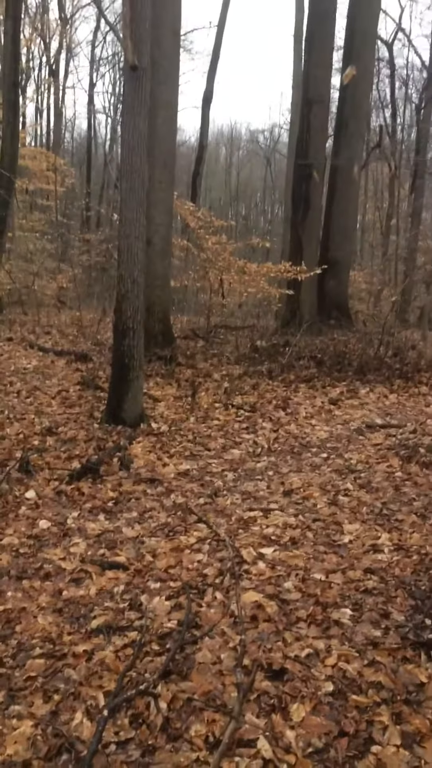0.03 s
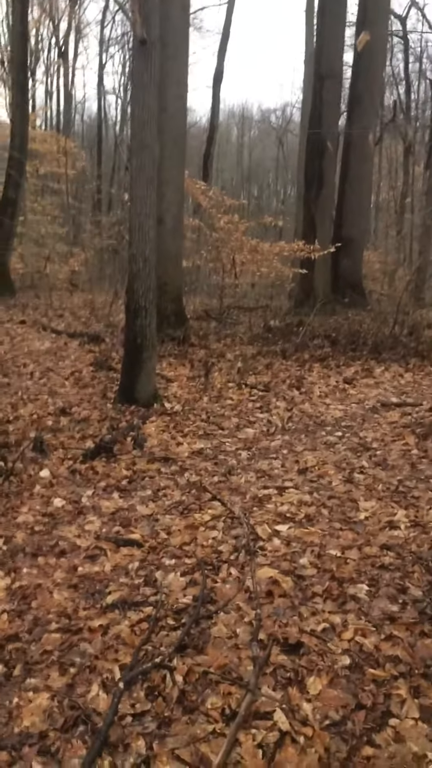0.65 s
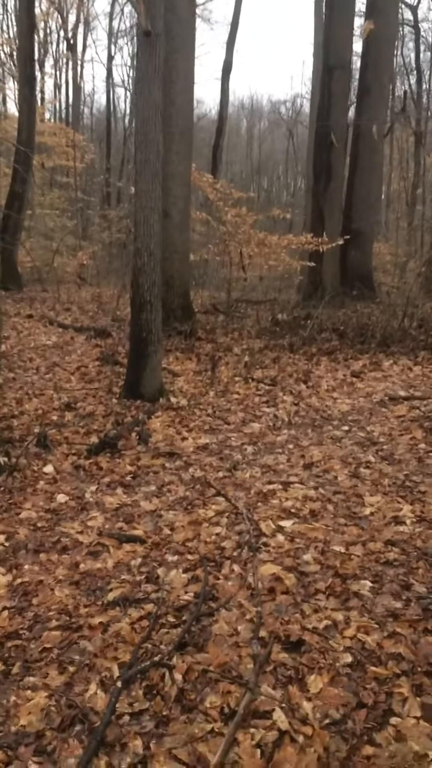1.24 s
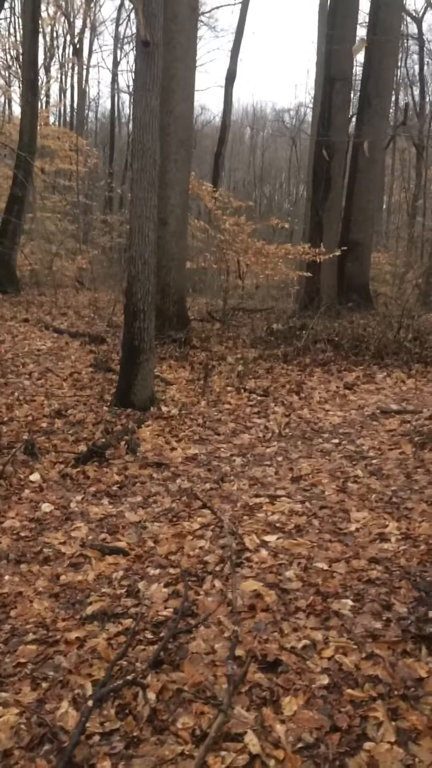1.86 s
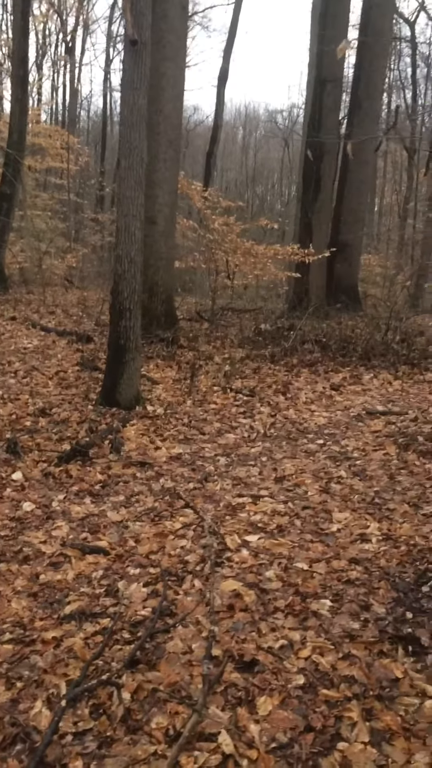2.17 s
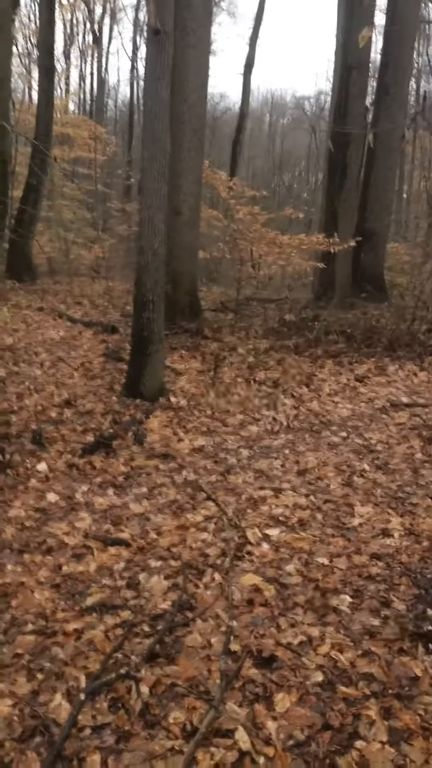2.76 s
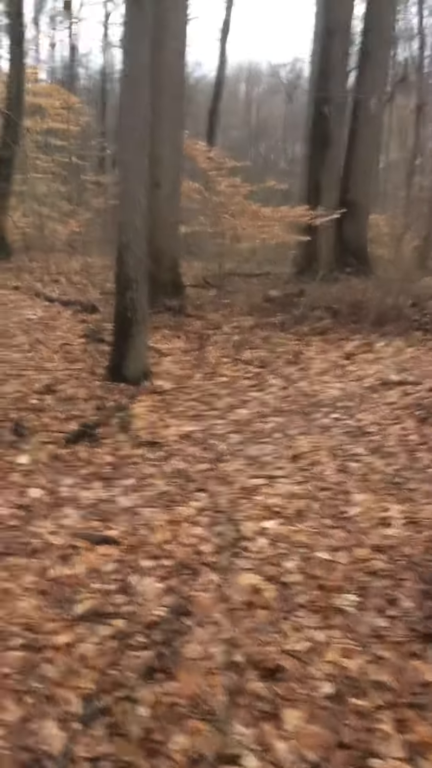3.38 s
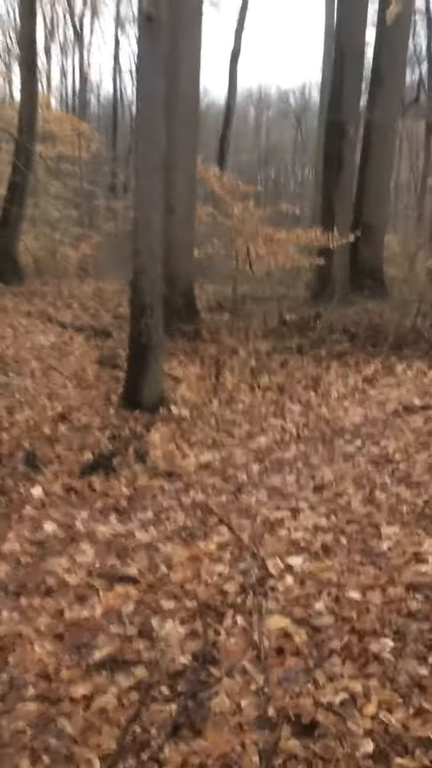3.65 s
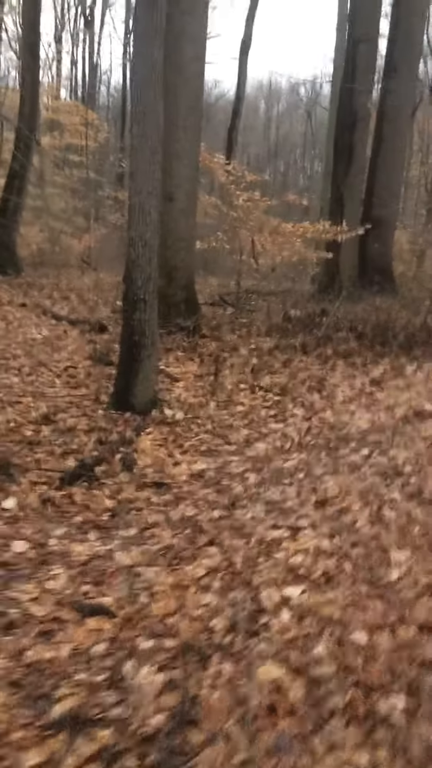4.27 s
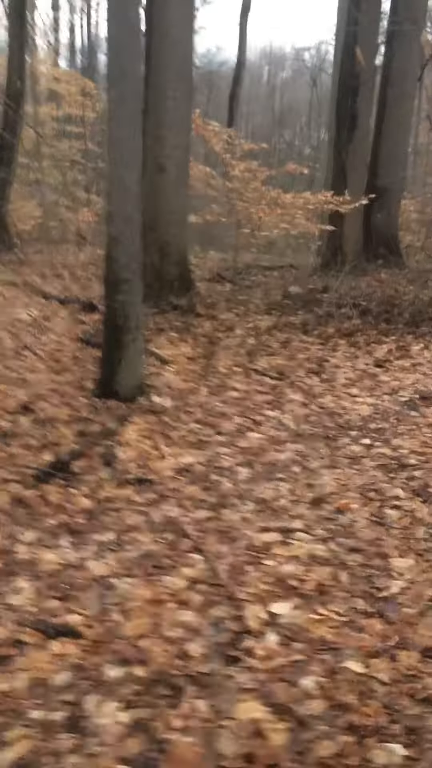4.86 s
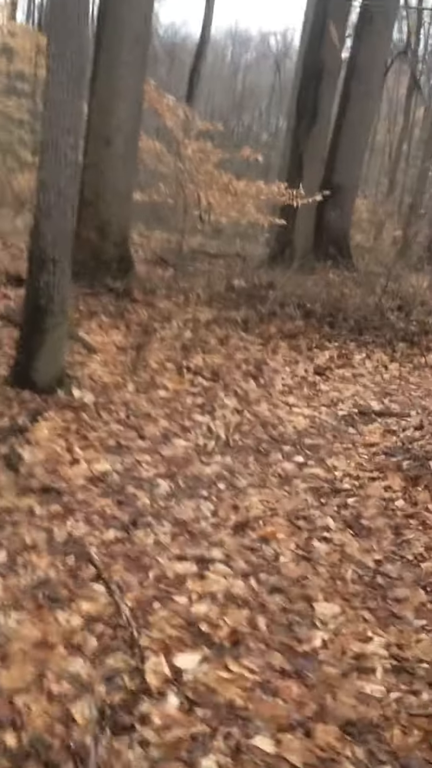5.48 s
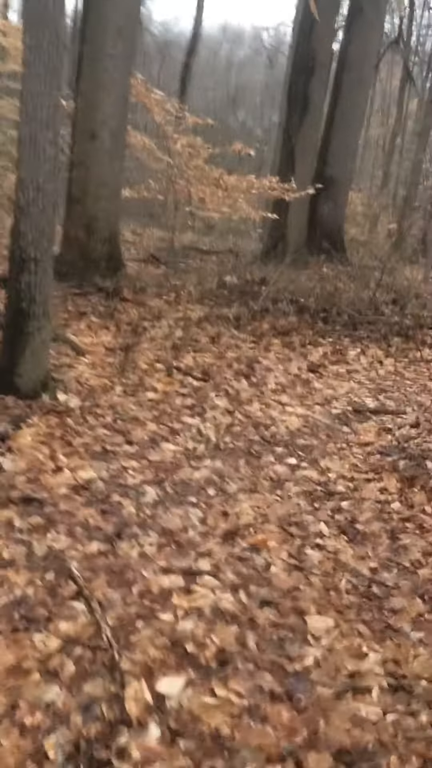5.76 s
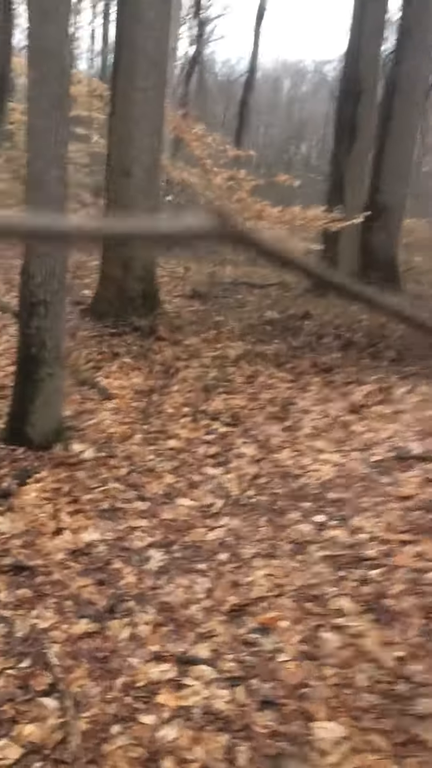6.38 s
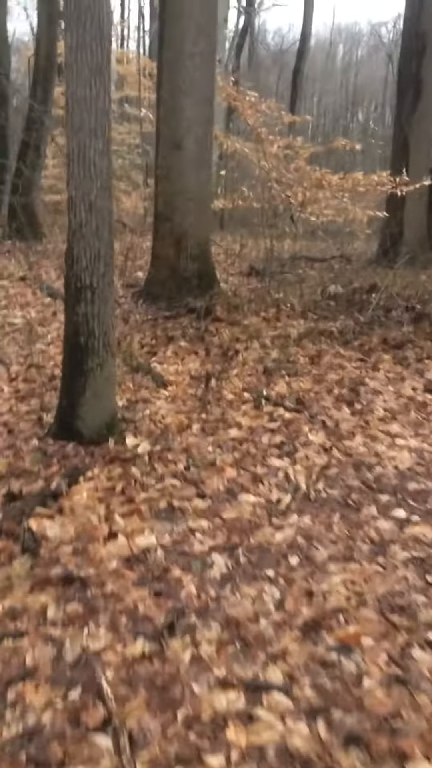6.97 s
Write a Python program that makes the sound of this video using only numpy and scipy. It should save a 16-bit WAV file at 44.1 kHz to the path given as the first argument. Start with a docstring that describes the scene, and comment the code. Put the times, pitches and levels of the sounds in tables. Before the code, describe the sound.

Many small frogs whistle steadily over faint traffic and breeze, as someone walks slowly through dry leaves, cracking small stems.

```python
"""Over far traffic and breeze on the microphone, a dense chorus of small frogs peeps from a woodland pond:
each call is a short rising whistle that echoes off bare trunks. A low engine drones through the first half.
Someone starts walking slowly through dry leaves, and hoarse whistles come from deep in the wood.
Near 3 s a bird squeals once; then stems crack underfoot. Near the end a twig knocks on the microphone."""
import sys
import numpy as np
from scipy import signal
from scipy.fft import rfft, irfft
from scipy.io import wavfile
from scipy.ndimage import uniform_filter1d, map_coordinates

SR = 44100
rng = np.random.default_rng(int(sys.argv[2]) if len(sys.argv) > 2 else 0)


def int16_out(signal):
    """Quantize to a 16-bit WAV file."""
    q = np.round(np.clip(np.atleast_2d(signal).T, -1, 1) * 32767)
    wavfile.write(sys.argv[1], SR, q.astype(np.int16))


N = 310023
TIME = np.arange(N) / SR


def from_db(db):
    """Decibels to gain."""
    return 10 ** (np.asarray(db) / 20)


def rms_one(x):
    """Scale to rms 1."""
    return x / np.sqrt(np.mean(x ** 2) + 1e-20)


def in_time(rows):
    """Each column of a curve at every sample."""
    time_s, *columns = np.transpose(rows)
    return [np.interp(TIME, time_s, column) for column in columns]


def add(out, start_s, sound):
    """Mix a sound in at start_s, cut at the ends."""
    i = int(round(start_s * SR))
    low, high = max(i, 0), min(i + len(sound), N)
    if high > low:
        out[low:high] += sound[low - i:high - i]


def drift(knots_per_s):
    """Random wander, rms 1."""
    knots = rng.standard_normal(4096)
    return rms_one(map_coordinates(knots, [TIME * knots_per_s], order=1, mode="wrap"))


def coloured(white, spectrum):
    """Give a white signal a spectrum, rms 1."""
    hz, db = np.transpose(spectrum)
    bins_hz = np.maximum(np.fft.rfftfreq(N, 1 / SR), 1)
    gain = from_db(np.interp(np.log(bins_hz), np.log(hz), db)) * np.minimum(bins_hz / hz[0], 1)
    return rms_one(irfft(rfft(white) * gain, N))


def swells(rows, attack_s, release_db_per_s, sag_db_per_s=0):
    """Summed power of events that rise, hold or sag, and die away."""
    power = np.zeros(N)
    for peak_s, hold_s, db in rows:
        age_s = TIME - peak_s
        rise = np.clip(1 + age_s / attack_s, 0, 1)
        sag_db = sag_db_per_s * np.clip(age_s, 0, hold_s)
        release_db = release_db_per_s * np.maximum(age_s - hold_s, 0)
        power += (rise * from_db(db - sag_db - release_db)) ** 2
    return power


def woods(x, t60_s, echoes_per_s):
    """Scattered, decaying echoes off trunks; unit-energy response."""
    t = np.arange(SR) / SR
    echoes = rng.standard_normal(SR) * (rng.random(SR) < echoes_per_s / SR)
    echoes *= from_db(-60 * t / t60_s)
    return signal.fftconvolve(x, echoes / np.sqrt(np.sum(echoes ** 2) + 1e-20))[:N]


# background noise: freq_hz, density_db
BACKGROUND_SPECTRUM = [(100, -4.5), (200, -4), (330, 0.5), (480, -1.5), (900, 1.5), (1300, -2.5),
                       (1700, -7.5), (2200, -11.5), (3500, -48), (4600, -22), (5500, -32.5), (8000, -33.5),
                       (12000, -39.5), (16000, -44)]

def background_noise(level_db=-49, wander_db=0.71):
    """Low far-traffic murmur, a thin band of frog overtones near 4.6 kHz, faint microphone hiss."""
    gain = from_db(level_db + wander_db * drift(5))
    return gain * coloured(rng.standard_normal(N), BACKGROUND_SPECTRUM)


# engine drone: time_s, firing_hz, level_db
ENGINE_CURVE = [(0, 100.8, -65.5), (1.0, 103.3, -47), (1.9, 108, -45), (2.4, 103, -49.5), (2.7, 104.8, -42),
                (3.05, 112.5, -41.5), (3.2, 111, -57), (4.0, 113.2, -78)]

def engine(throb_db=0.5, waver=0.0089):
    """A far engine hums at its wavering firing rate."""
    firing_hz, db = in_time(ENGINE_CURVE)
    gain = from_db(db + throb_db * drift(15))
    firing_hz *= 1 + waver * drift(15)
    return gain * np.sin(2 * np.pi * np.cumsum(firing_hz) / SR)


# gusts: peak_s, hold_s, level_db
WIND_GUSTS = [(0.08, 3.5, -49), (1.47, 0.89, -49), (6.12, 0.34, -45)]
# wind rumble: freq_hz, density_db
WIND_SPECTRUM = [(20, -30), (35, -13), (52, -5.5), (85, 0), (120, -6.5), (170, -16.5), (300, -36),
                 (600, -71)]

def wind(breeze_db=-54.5, gain_db=1, lump_db=2):
    """Air moves over the microphone in lumps; gusts drop back to a light breeze."""
    gust_power = swells(WIND_GUSTS, attack_s=0.12, release_db_per_s=110)
    flow = np.sqrt(from_db(breeze_db) ** 2 + gust_power)
    lumps = from_db(gain_db + lump_db * drift(30))
    return flow * lumps * coloured(rng.standard_normal(N), WIND_SPECTRUM)


def peep(mid_hz, glide_hz_per_s, bend=0.13, fade_share=0.43, sac_hz=3080, sac_width_hz=260):
    """A near-pure whistle on an easing glide, loudest nearest the vocal sac's resonance."""
    sweep_hz = np.clip(mid_hz - 2400, 130, 470)  # deep voices sweep less far
    length_s = min(sweep_hz / max(abs(glide_hz_per_s), 1), 0.3)
    position = np.linspace(-1, 1, int(length_s * SR))
    pitch_hz = mid_hz + glide_hz_per_s * length_s / 2 * (position - bend * position ** 2)
    phase = 2 * np.pi * (np.cumsum(pitch_hz) / SR + rng.random())
    swell = np.sin(np.pi / 2 * np.minimum((1 - abs(position)) / fade_share, 1)) ** 2
    sac = 1 / np.hypot(1, (pitch_hz - sac_hz) / sac_width_hz)
    tone = np.sin(phase) + from_db(-37) * np.sin(1.5 * phase) + from_db(-39) * np.sin(2 * phase)
    return np.sqrt(2) * swell * sac / sac.max() * tone


def callers(calls, spot_count):
    """Peeps dealt in turn to spots, one track each."""
    spots = np.zeros((spot_count, N))
    for k, (mid_s, hz, glide_hz_per_s, db) in enumerate(calls):
        call = from_db(db) * peep(hz, glide_hz_per_s)
        add(spots[k % spot_count], mid_s - len(call) / SR / 2, call)
    return spots


def neighbours(calls_per_s, pitch_hz, spread_hz, glide_hz_per_s, level_db, uneven_db=0.5, count=64):
    """Call rows for like-sized frogs a little farther off, peeping loosely in turn."""
    jitter, voice, loudness = rng.uniform(-1.1, 1, (count, 3)).T
    times_s = (np.arange(count) + 0.5 + 0.33 * jitter) / calls_per_s
    calls = zip(times_s, pitch_hz + spread_hz * voice, level_db + uneven_db * loudness)
    return [(mid_s, hz, glide_hz_per_s, db) for mid_s, hz, db in calls if mid_s < N / SR]


# nearest frogs' calls: mid_s, pitch_hz, level_db
NEAR_PEEPS = [(0.014, 2760, -39.5), (0.061, 2996, -43), (0.33, 3102, -39.5), (0.36, 3180, -41.5),
              (0.568, 2822, -42), (0.83, 2880, -40.5), (1.046, 2980, -43), (1.244, 2805, -46),
              (1.4, 2615, -51), (1.64, 2845, -40), (1.737, 3065, -51), (1.799, 2764, -42),
              (2.072, 2890, -42.5), (2.147, 2700, -49.5), (2.13, 3113, -44.5), (2.281, 2886, -46),
              (2.5, 3026, -42.5), (2.727, 3047, -42), (2.956, 2580, -54), (3.246, 2992, -39),
              (3.489, 2460, -56), (3.63, 2870, -42), (3.855, 3080, -43.5), (4.144, 3013, -41.5),
              (4.3, 2848, -38.5), (4.368, 3005, -44.5), (4.546, 2720, -44), (4.673, 2447, -55.5),
              (4.942, 2990, -43), (5.145, 2866, -44.5), (5.312, 3044, -41.5), (5.44, 2990, -40),
              (5.52, 3060, -39.5), (5.719, 2980, -41.5), (6.147, 2455, -52.5), (6.334, 2746, -44),
              (6.476, 3043, -41), (6.578, 2600, -49), (6.78, 3105, -45.5), (6.96, 2894, -43)]
# upward glide by voice: pitch_hz, glide_hz_per_s
PEEP_GLIDES = [(2440, 600), (2630, 2100), (2780, 2800)]

def near_frogs(gain_db=-3, echo_db=-3):
    """Near frogs call from six spots, each with its own echoes."""
    calls = [(mid_s, hz, np.interp(hz, *np.transpose(PEEP_GLIDES)), db) for mid_s, hz, db in NEAR_PEEPS]
    calls += neighbours(calls_per_s=6.5, pitch_hz=3276, spread_hz=75.2, glide_hz_per_s=2750, level_db=-50)
    calls += neighbours(calls_per_s=3.5, pitch_hz=2677, spread_hz=90, glide_hz_per_s=2200, level_db=-53.5)
    spots = callers(calls, spot_count=6)
    echoes = sum(woods(spot, t60_s=0.3, echoes_per_s=350) for spot in spots)
    return from_db(gain_db) * (spots.sum(axis=0) + from_db(echo_db) * echoes)


def far_frogs(calls_per_s=80, pitch_hz=3040, spread_hz=165, top_hz=3230, level_db=-44, rise_db_per_s=0.3858):
    """Dozens more blur into a shimmering band that grows as the walker nears the pond."""
    crowd = np.zeros(N)
    for k, (jitter, voice, speed, nearness) in enumerate(rng.standard_normal((900, 4))):
        start_s = (k + jitter) / calls_per_s - 0.2
        if start_s < N / SR:
            gain = from_db(2 * nearness - 0.37 * voice ** 2)  # unusually high or low voices are weaker
            hz = min(pitch_hz + spread_hz * voice, top_hz)
            add(crowd, start_s, gain * peep(hz, glide_hz_per_s=2800 + 300 * speed))
    echoes = woods(crowd, t60_s=0.78, echoes_per_s=890)
    return from_db(level_db + rise_db_per_s * TIME) * rms_one(crowd + echoes)


# feet pressing or brushing the litter: peak_s, hold_s, level_db
TREADS = [(0.59, .01, -68), (0.99, 0.017, -69), (1.58, 0.25, -66), (1.92, 0.29, -67.5), (2.21, 0.054, -63),
          (2.39, .04, -70), (3.26, .035, -62), (3.48, 0.062, -65), (3.73, .05, -71), (4.185, .18, -59.5),
          (4.45, 0.034, -70), (5.085, 0.26, -57.5), (5.8, 0.032, -64), (5.96, 0.16, -55.5),
          (6.36, .03, -67), (6.825, .21, -57.5)]
# leaf rustle: freq_hz, density_db
LEAF_SPECTRUM = [(300, 3), (1500, 5.5), (3500, -5), (5500, -1.5), (7500, -4), (10000, -10.5), (13000, -16),
                 (16000, -32)]

def footsteps(crushes_per_s=100, crush_t60_s=0.045, crush_share=0.28, gain_db=4):
    """Dry leaves give way in dying sprays of tiny snaps; a heavier tread makes more snaps."""
    tread_power = swells(TREADS, attack_s=0.074, release_db_per_s=102, sag_db_per_s=21)
    tread_db = 10 * np.log10(tread_power + 1e-10)
    collapses = (rng.random(N) < crushes_per_s / SR) * rng.exponential(1, N)
    decay = from_db(-60 / (crush_t60_s * SR))
    crush = rms_one(signal.lfilter([1], [1, -decay], collapses))
    snaps_per_s = 2200 * from_db(0.36 * (tread_db + 62))
    snaps = (rng.random(N) < snaps_per_s / SR) * rng.choice([-1.0, 1.0], N)
    snaps /= np.sqrt(uniform_filter1d(snaps ** 2, size=4001) + 1e-6)  # level follows tread, not count
    envelope = from_db(tread_db + gain_db) * (1 - crush_share + crush_share * crush)
    return envelope * coloured(snaps, LEAF_SPECTRUM)


# distant calls: mid_s, pitch_hz, glide_hz_per_s, level_db
HOARSE_CALLS = [(1.56, 2440, 112, -57), (2.16, 2405, 504, -58), (2.85, 2350, -900, -59),
                (3.03, 2440, 302, -60.5), (3.62, 2280, -900, -60), (5.8, 2350, -500, -61)]

def far_whistles(flutter_per_s=180):
    """Hoarser, lower calls from deep in the wood arrive only as echoes."""
    hoarse = callers(HOARSE_CALLS, spot_count=1)[0] * drift(flutter_per_s)
    return woods(hoarse, t60_s=0.93, echoes_per_s=1900)


# falling squeal: time_s, pitch_hz, level_db
SQUEAL_CURVE = [(2.885, 2370, -74), (2.9, 2175, -55), (2.92, 1990, -55), (2.945, 1800, -52),
                (2.965, 1660, -62), (3.025, 1603, -61), (3.07, 1460, -68)]
# its harmonics: multiple, level_db
SQUEAL_HARMONICS = [(1, -9), (2, 0), (3, -10), (4, -14), (5, -13), (6, -22)]

def bird(roughness=0.0236, gain_db=-3):
    """One thin squeal falls in pitch and trails off among the trees."""
    pitch_hz, db = in_time(SQUEAL_CURVE)
    phase = 2 * np.pi * np.cumsum(pitch_hz * (1 + roughness * drift(900))) / SR
    tone = sum(from_db(level_db) * np.sin(k * phase) for k, level_db in SQUEAL_HARMONICS)
    sounding = (TIME > SQUEAL_CURVE[0][0]) & (TIME < SQUEAL_CURVE[-1][0])
    call = sounding * from_db(db + gain_db) * tone
    return call + woods(call, t60_s=0.82, echoes_per_s=1600)


def crumble(t60_s):
    """A spiky, fast-dying burst of splintering."""
    t = np.arange(SR // 10) / SR
    noise = rng.standard_normal(len(t))
    return noise * abs(noise) * from_db(-60 * t / t60_s)


# single stems and leaves breaking: start_s, peak_db, pitch_hz
STEM_CRACKS = [(3.2783, -39, 5580), (3.4868, -43.5, 6400), (4.1819, -44, 5370), (5.0837, -38, 5330),
               (5.1826, -44, 4330), (5.2797, -35, 4430), (5.304, -39, 5650), (5.457, -40, 4470),
               (6.14, -39, 4080), (6.286, -44.5, 6860), (6.3656, -41, 4800), (6.8154, -42, 5590),
               (6.992, -45, 6100)]

def stem_cracks(leaf_q=3.7, direct_db=-19):
    """A stem breaks in a short crumble, coloured by the leaf it holds."""
    out = np.zeros(N)
    for start_s, peak_db, pitch_hz in STEM_CRACKS:
        burst = crumble(t60_s=0.027)
        leaf = signal.lfilter(*signal.iirpeak(pitch_hz, leaf_q, fs=SR), burst)
        crack = leaf + from_db(direct_db) * burst
        add(out, start_s, from_db(peak_db) * crack / abs(crack).max())
    return out


def ring(clicks, hz, t60_s):
    """One mode: a unit click starts a decaying sine of height 1."""
    decay = from_db(-60 / (t60_s * SR))
    step_rad = 2 * np.pi * hz / SR
    feedback = [1, -2 * decay * np.cos(step_rad), decay ** 2]
    return signal.lfilter([0, np.sin(step_rad)], feedback, clicks + 1e-18)


# twig strikes: start_s, level_db
TWIG_KNOCKS = [(6.619, -18), (6.622, -34), (6.625, -28.5), (6.629, -38), (6.6359, -32), (6.64, -30)]
# microphone casing modes: freq_hz, gain_db, t60_s
CASING_MODES = [(237, -25, 0.031), (423, -15, 0.064), (647, -17, 0.042), (1080, -5.5, 0.011),
                (1197, -17, 0.037), (1340, -3, 0.017), (2170, -5, 0.0062), (3430, -6.5, 0.0056),
                (4500, -44, .005)]

def twig(tick_db=-20, scrape_db=-41):
    """A twig raps the casing and chatters along it, its bark scraping at each touch."""
    clicks = np.zeros(N)
    for start_s, level_db in TWIG_KNOCKS:
        add(clicks, start_s, from_db([level_db]))
    scrape = signal.fftconvolve(clicks, crumble(t60_s=0.1))[:N]
    casing = sum(from_db(db) * ring(clicks, hz, t60_s) for hz, db, t60_s in CASING_MODES)
    return from_db(tick_db) * clicks + from_db(scrape_db) * scrape - casing


def scene():
    """Animals, walker and surroundings at one microphone."""
    animals = near_frogs() + far_frogs() + far_whistles() + bird()
    walker = footsteps() + stem_cracks() + twig()
    surroundings = background_noise() + engine() + wind()
    return (animals + walker + surroundings)[None]


def record(dry, cutoff_hz=15700):
    """Steep low-pass."""
    return signal.sosfilt(signal.ellip(10, 0.1, 80, cutoff_hz, fs=SR, output="sos"), dry)


dry = scene()
out = record(dry)
int16_out(out)
```